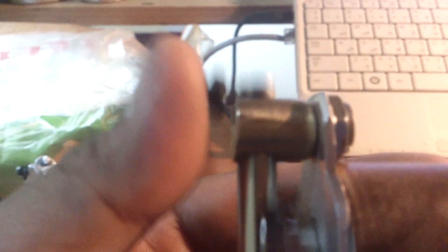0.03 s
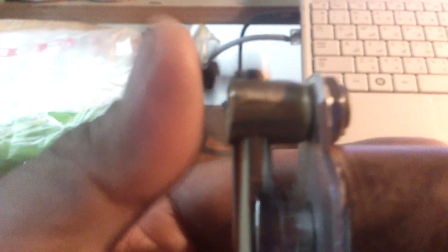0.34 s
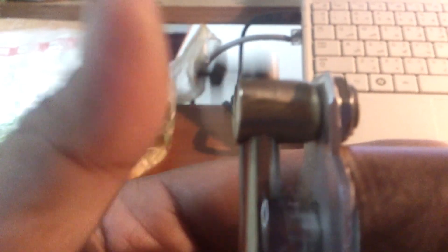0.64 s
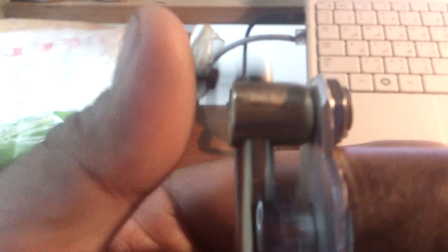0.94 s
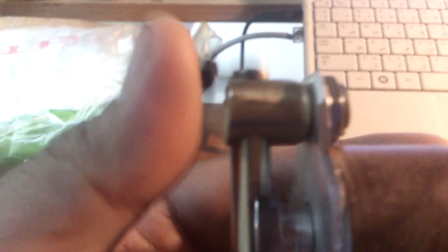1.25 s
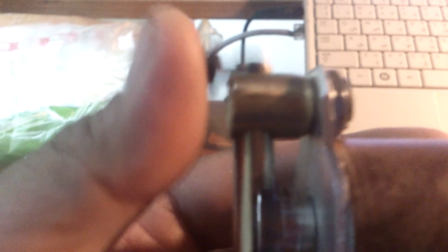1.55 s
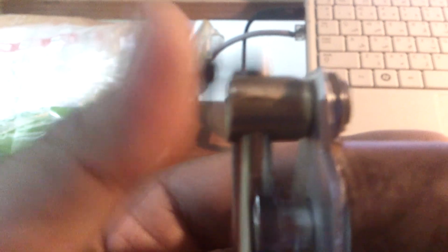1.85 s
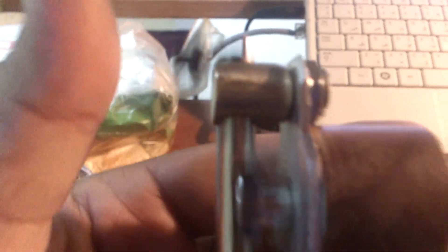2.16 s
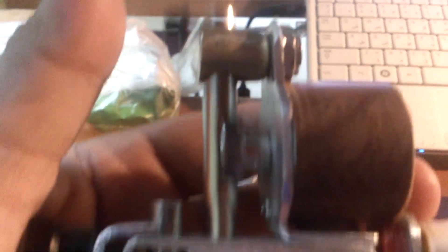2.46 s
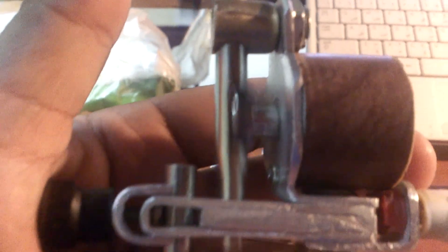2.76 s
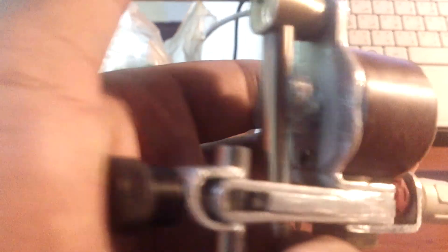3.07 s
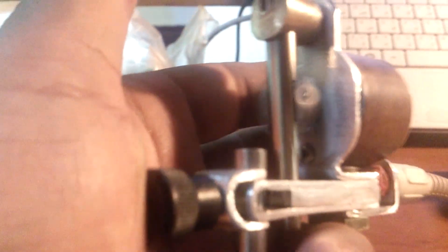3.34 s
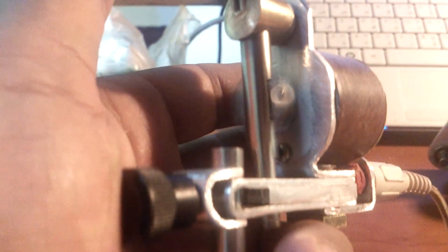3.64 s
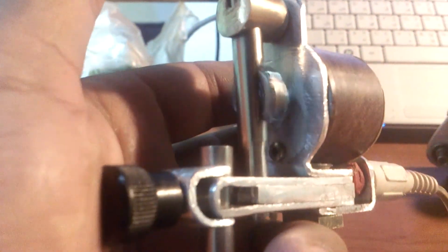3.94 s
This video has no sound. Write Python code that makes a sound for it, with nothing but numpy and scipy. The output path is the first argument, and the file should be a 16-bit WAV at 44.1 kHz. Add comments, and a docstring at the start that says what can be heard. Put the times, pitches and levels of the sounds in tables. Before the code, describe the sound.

Loud, fast steel rattling from a small handheld motor, which sags twice and then cuts off.

```python
"""Motor-driven needle bar.

A small rotary motor drives the bar, close by in a small room. Each turn knocks the loose steel linkage
and rings the frame. Twice a thumb presses on the bar: the motor slows, the rattle tightens.
The machine is regripped, tilted and switched off, then clicks to rest over a low hum."""
import sys
import numpy as np
from scipy import signal
from scipy.fft import rfft, irfft
from scipy.io import wavfile
from scipy.ndimage import uniform_filter1d, minimum_filter1d

SR = 44100
rng = np.random.default_rng(int(sys.argv[2]) if len(sys.argv) > 2 else 0)


def file_out(sig):
    """Save sig as 16-bit WAV at sys.argv[1]."""
    # one column per channel
    cols = np.atleast_2d(sig).T
    # limit, then scale
    lim = np.clip(cols, -1, 1)
    pcm = np.round(lim * 32767).astype(np.int16)
    wavfile.write(sys.argv[1], SR, pcm)


N = 176400
T = np.arange(N) / SR

# motor speed: t/s, f/Hz
MOTOR_SPEED = [(0.0, 68.1), (0.09, 64.9), (0.19, 54.7), (0.3, 53.1), (0.54, 51.6), (0.67, 67.1),
               (0.76, 68.9), (1.04, 68.7), (1.12, 64.2), (1.22, 52.2), (1.42, 53.0), (1.58, 50.4),
               (1.83, 51.4), (1.94, 65.5), (2.1, 69.2), (2.5, 68.7), (2.6, 64.3), (2.7, 67.4), (2.95, 68.9),
               (3.2, 66.9), (3.4, 68.2), (3.55, 66.1), (3.68, 68.6), (3.8, 59.1)]
# rattle strength: t/s, level/dB
RATTLE_LEVEL = [(0.0, -11), (0.04, -11.5), (0.59, -14), (0.7, -12), (0.89, -12), (0.94, -15), (0.95, -12.5),
                (1.62, -13), (1.63, -14.5), (1.92, -13), (2.93, -13.5), (3.39, -11.5), (3.4, -13),
                (3.78, -12)]
# knocks of one turn: place/turns, scatter/turns, pressed level/dB, free level/dB, decay/s,
# accent f/Hz, accent level/dB
TURN_KNOCKS = [(0.064, .012, -15.5, -36, .0012, 1420, 15), (.13, .025, -3.5, -4.5, 0.0011, 7840, 0.5),
               (.21, .025, -4.5, -3, 0.0016, 9200, -7), (.29, .04, -5.5, -9, 0.00095, 6000, -6.5),
               (.38, .035, -4.5, -10.5, 0.0012, 3450, 5.5), (.50, .04, -13, -6, 0.0011, 5100, -11),
               (.69, .03, -10.5, -8, 0.003, 2260, 1), (.775, .03, -14, -21.5, .001, 9500, 9.5),
               (.98, .04, -14, -9.5, 0.0006, 10200, -12)]
# broad frame response: f/Hz, level/dB (pressed, free, regripped, tilted)
FRAME_COLOUR = [(250, -36, -30, -32, -33), (530, -35, -31, -33, -27.5), (734, -23.5, -20, -21.5, -22.5),
                (955, -21.5, -18, -20.5, -22), (1340, -17.5, -13.5, -14, -12),
                (2150, -9.5, -11, -12.5, -11), (2750, -12.5, -13, -13.5, -16.5),
                (3950, -8, -10.5, -11.5, -17), (4640, -9.5, -10, -11.5, -9), (6420, -9, -12, -5.5, -2),
                (7100, -10, -9, -9.5, -6.5), (8370, -3, -3.5, -4.5, -5.5), (10230, -3.5, -3, -4.5, -1),
                (12050, -9.5, -10.5, -9.5, -8), (14100, -15, -13, -15, -16.5),
                (15400, -14, -15.5, -15, -14)]
# frame and bar resonances: f/Hz, width/Hz, height/dB (pressed, free, regripped, tilted)
FRAME_MODES = [(680, 60, 3, 3, 0, -3), (1130, 90, 2, 0, 0, 0), (1433, 74, 2, 4, 3, -2),
               (1725, 90, 5, -2, 0, -3), (2110, 80, 2, 3, 1, -2), (2338, 112, 1, 1, 2, 7),
               (3019, 150, 6, 7, 5, 12), (3194, 101, 7, 1, 1, 12), (4136, 137, 1, -7, 4, 17),
               (4262, 60, 0, -4, 9, 14), (4763, 82, 11, 13, 13, 8), (4900, 150, 11, 12, 14, 9),
               (5385, 150, -10, 10, 6, 0), (5582, 75, 6, 11, 12, 1), (5797, 126, 11, 14, 6, -3),
               (6030, 123, 12, 15, 2, -10), (6449, 150, 9, 15, 3, -10), (6737, 115, 14, 18, 5, 2),
               (6893, 75, 10, 13, 7, -11), (7610, 150, 1, 5, 3, -10), (8303, 147, 3, 6, 1, 5),
               (8473, 75, 3, 7, 2, 3), (8577, 75, 6, 6, -3, -11), (11417, 75, 3, 2, -2, -12),
               (12574, 118, 6, 5, 4, 4), (13912, 75, 2, 3, 6, 2)]
# machine tilt: t/s, tilt/0-1
MACHINE_TILT = [(2.4, 0), (3.02, .1), (3.14, 1)]
# room decay: f/Hz, T60/s
ROOM_DECAY = [(300, 1), (2000, 0.22), (6000, .26), (14000, .2)]
# steady hum: f/Hz, rms level/dB
HUM_TONES = [(56.7, -45.5), (170.1, -67), (350, -63)]
# room noise spectrum: f/Hz, relative level/dB
ROOM_NOISE = [(20, -32), (38, -24), (50, -13), (80, 7), (110, -8.5), (200, -5.5), (350, -4.5), (550, -9),
              (800, -15), (2000, -14), (8000, -41), (16000, -42)]
# run-down knocks: t/s, relative level/dB
LAST_KNOCKS = [(3.8012, -10), (3.813, -14), (3.827, -10.5), (3.840, -23), (3.858, -22), (3.863, -14),
               (3.8799, -19), (3.908, -24), (3.912, -25), (3.922, -30), (3.9338, -24), (3.943, -32)]

FREE_HZ, PRESSED_HZ = 67.65, 53.2  # motor speed
REGRIP_S, THUMB_AWAY_S, OFF_S = (1.89, 2.13), 2.0, 3.792


def amp(db):
    """Decibels to gain."""
    return 10 ** (np.asarray(db) / 20)


def unit(x):
    """Scales to rms 1."""
    return x / np.sqrt(np.mean(x ** 2) + 1e-20)


def curve(points):
    """Breakpoints to samples."""
    return np.interp(T, *np.transpose(points))


def over_hz(points, hz, column=1):
    """Table column interpolated over log frequency."""
    table = np.array(points, float)
    return np.interp(np.log(hz + 1), np.log(table[:, 0]), table[:, column])


def add(mix, start_s, sound):
    """Mixes a sound in, in place."""
    part = mix[max(round(start_s * SR), 0):][:len(sound)]
    part += sound[:len(part)]


def accent(x, hz, db, q=2):
    """Adds a band-passed copy at the given level."""
    b, a = signal.iirpeak(hz, q, fs=SR)
    return x + amp(db) * signal.lfilter(b, a, x)


def knock(decay_s, attack_s=0.00019, shiver_s=0.0041, shiver_db=-15.5, grain_db=2.5):
    """Burst of tiny, uneven steel contacts, then a weaker shiver; constant energy."""
    age_s = T[:900]
    noise, grain = rng.standard_normal((2, len(age_s)))
    rise = 1 - np.exp(-age_s / attack_s)
    fall = np.exp(-age_s / decay_s) + amp(shiver_db) * np.exp(-age_s / shiver_s)
    burst = noise * amp(grain_db * grain) * rise * fall
    return burst / np.linalg.norm(burst) * np.sqrt(SR / FREE_HZ)


def linkage(speed_hz, press, rub_db=-15):
    """One round of knocks per turn over rubbing noise; tight under the thumb, loose without it."""
    turns = np.cumsum(speed_hz) / SR
    turn_index = np.arange(int(turns[-1]) + 1)
    turn_start_s = np.interp(turn_index, turns, T)
    held = np.interp(turn_start_s, T, press)
    by_thumb = lambda pressed, free: held * pressed + (1 - held) * free
    force, play, glint = rng.standard_normal((len(turn_index), 3)).T
    turn_db = by_thumb(.5, 1.17) * force
    wander_s = by_thumb(.0001, .0003) * play
    rattle = np.zeros(N)
    for place, scatter, pressed_db, free_db, decay_s, accent_hz, accent_db in TURN_KNOCKS:
        late, hard = rng.standard_normal((2, len(turn_index)))
        knock_turns = turn_index + place + scatter * by_thumb(.3, 1) * late
        times_s = np.interp(knock_turns, turns, T) + wander_s
        levels_db = by_thumb(pressed_db, free_db) + turn_db + by_thumb(.7, 2) * hard
        track = np.zeros(N)
        for start_s, db in zip(times_s, levels_db):
            add(track, start_s, amp(db) * knock(decay_s) * (start_s < OFF_S))
        rattle += accent(track, accent_hz, accent_db)
    # some loose turns strike brighter
    glint_db = -8.5 + 7 * (1 - press) * np.minimum(glint, 2)[turns.astype(int)]
    rattle = accent(rattle, hz=11500, db=glint_db, q=3.2)
    rub = amp(rub_db) * rng.standard_normal(N) * (T < OFF_S)
    return (unit(rattle) + rub) * amp(curve(RATTLE_LEVEL))


def frame(drive, shares, size=8192):
    """Steel frame rung by the linkage; grip and tilt reweight its resonances."""
    hz = abs(np.fft.fftfreq(size, 1 / SR))
    bell = lambda centre_hz, width_hz: 1 / (1 + (2 * (hz - centre_hz) / width_hz) ** 2)
    notch_db = -4.5 * bell(centre_hz=1580, width_hz=41)
    out = np.zeros(N)
    for grip, share in enumerate(shares):
        peaks = sum(amp(heights_db[grip]) ** 2 * bell(mode_hz, width_hz)
                    for mode_hz, width_hz, *heights_db in FRAME_MODES)
        gain = amp(over_hz(FRAME_COLOUR, hz, column=grip + 1) + notch_db) * np.sqrt(1 + peaks)
        minimum_phase = np.exp(np.conj(signal.hilbert(np.log(gain))))
        ring = np.fft.ifft(minimum_phase).real[:size // 2]
        out += signal.oaconvolve(drive * share, ring / np.linalg.norm(ring))[:N]
    return out


def room(x, tail_db=-10.5, first_echo_s=0.0044, tails_per_s=3.934, count=5):
    """Direct sound plus short tails, crossfaded as the moving hand changes the echoes."""
    age_s = T[:SR // 2]
    out = x.copy()
    for k, noise in enumerate(rng.standard_normal((count, len(age_s)))):
        hz, frame_s, spectrum = signal.stft(noise * (age_s > first_echo_s), SR, nperseg=256)
        decay = amp(-60 * frame_s / over_hz(ROOM_DECAY, hz)[:, None])
        tail = signal.istft(spectrum * decay, SR, nperseg=256)[1][:len(age_s)]
        offset = (T * tails_per_s + k) % count - count / 2
        share = np.cos(np.pi / 2 * np.clip(offset, -1, 1))
        out += amp(tail_db) * signal.oaconvolve(x * share, tail / np.linalg.norm(tail))[:N]
    return out


def background(beat_end_s=1.27, noise_db=-48):
    """Low hum and room noise; a second hum beats against the first early on."""
    tone = lambda hz, db: np.sqrt(2) * amp(db) * np.sin(2 * np.pi * hz * T)
    hum = sum(tone(hz, db) for hz, db in HUM_TONES)
    second_hum = tone(hz=60.2, db=-49.5) * np.clip((beat_end_s - T) * 20, 0, 1)
    colour = amp(over_hz(ROOM_NOISE, np.fft.rfftfreq(N, 1 / SR)))
    noise = irfft(rfft(rng.standard_normal(N)) * colour, N)
    return hum - second_hum + amp(noise_db) * unit(noise)


def run_down(gain_db=-10, lowpass_hz=11400):
    """Power off: the knocks fade, soft and duller, and the bar rings on."""
    knocks = np.zeros(N)
    for start_s, db in LAST_KNOCKS:
        add(knocks, start_s, amp(db + gain_db) * knock(decay_s=0.0044))
    dull = signal.lfilter(*signal.butter(1, lowpass_hz, fs=SR), knocks)
    return accent(dull, hz=4250, db=-0.5, q=22)


def scene():
    """Machine in the room, mono; thumb pressure is derived from the sag in speed."""
    speed_hz = curve(MOTOR_SPEED)
    press = np.clip((FREE_HZ - speed_hz) / (FREE_HZ - PRESSED_HZ), 0, 1) * (T < THUMB_AWAY_S)
    regrip = np.interp(T, REGRIP_S, (0, 1))
    tilt = curve(MACHINE_TILT)
    # pressed, free, regripped, tilted
    shares = press * (1 - regrip), (1 - press) * (1 - regrip), regrip * (1 - tilt), regrip * tilt
    machine = frame(linkage(speed_hz, press) + run_down(), shares)
    return (room(machine) + background())[None]


def record(dry, limit_db=-.2, knee=5.3, window_samples=45, lowpass_hz=15730):
    """Fast soft-knee limiter near full scale, then a steep low-pass."""
    peak = -minimum_filter1d(-abs(dry), window_samples)
    gain = (1 + (peak / amp(limit_db)) ** knee) ** (-1 / knee)
    smooth_gain = uniform_filter1d(uniform_filter1d(gain, window_samples), window_samples // 2)
    lowpass = signal.firwin(801, lowpass_hz, window=("kaiser", 9), fs=SR)
    return signal.oaconvolve(dry * smooth_gain, lowpass[None], "same")


dry = scene()
out = record(dry)
file_out(out)
```